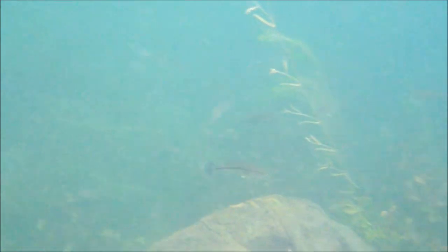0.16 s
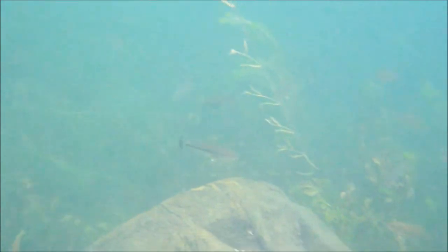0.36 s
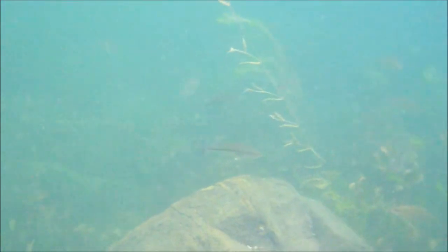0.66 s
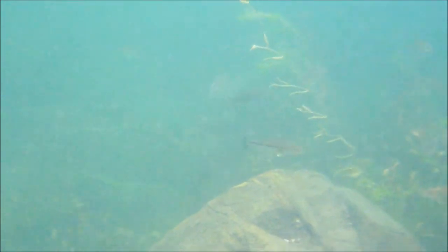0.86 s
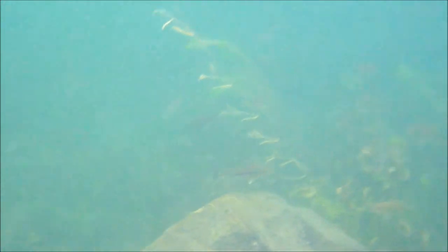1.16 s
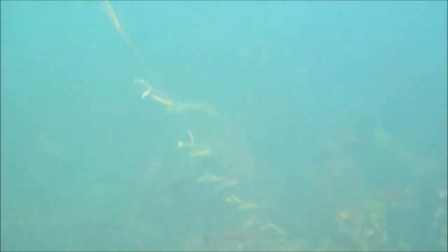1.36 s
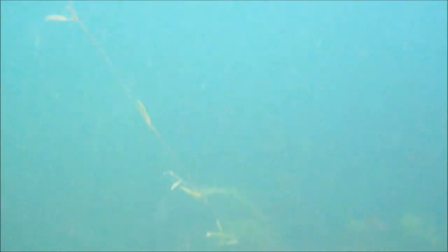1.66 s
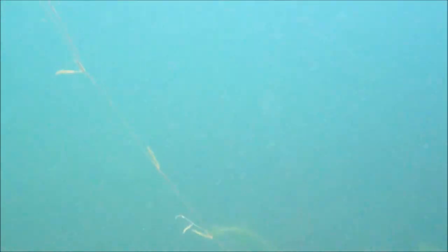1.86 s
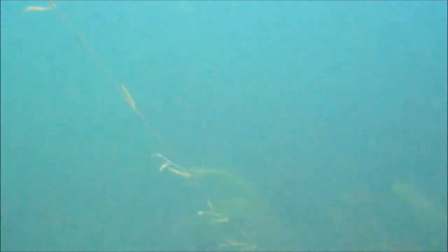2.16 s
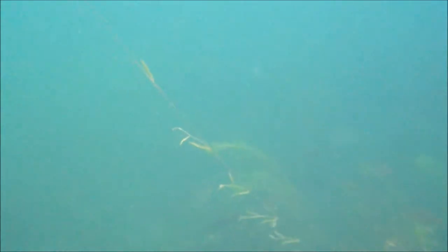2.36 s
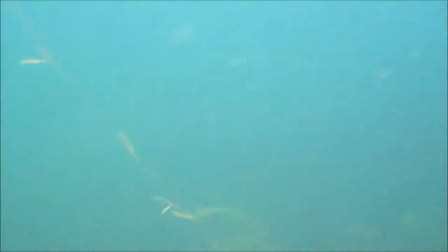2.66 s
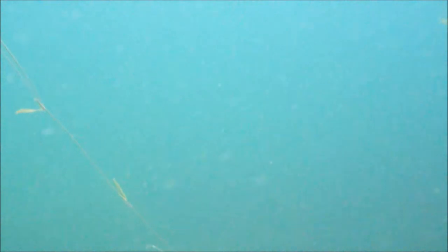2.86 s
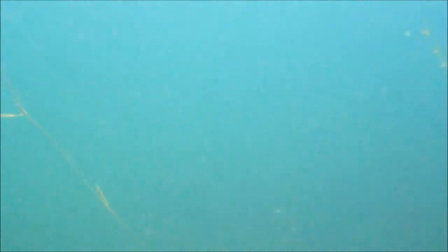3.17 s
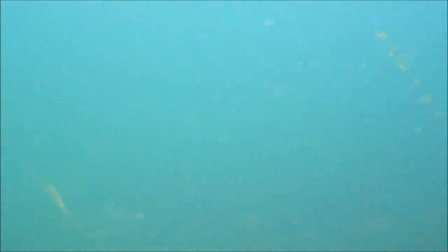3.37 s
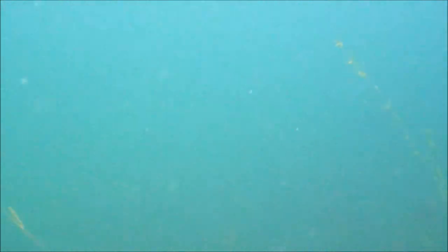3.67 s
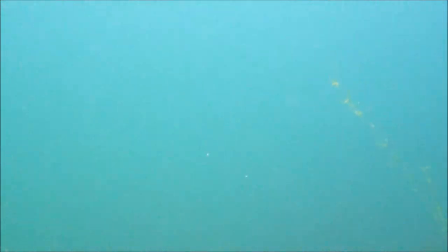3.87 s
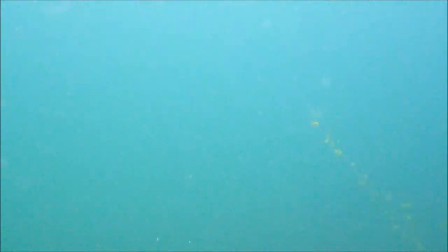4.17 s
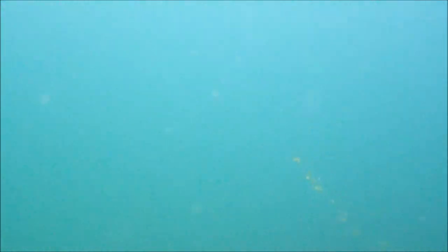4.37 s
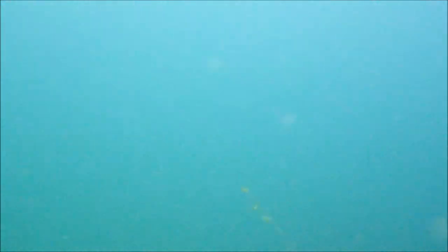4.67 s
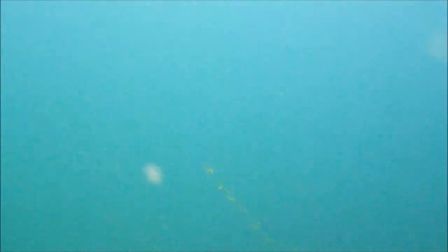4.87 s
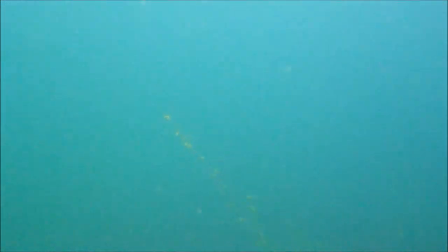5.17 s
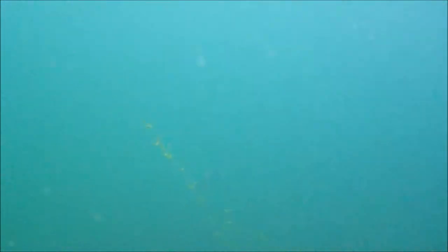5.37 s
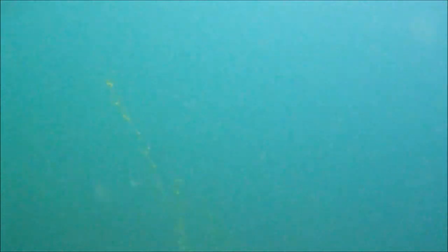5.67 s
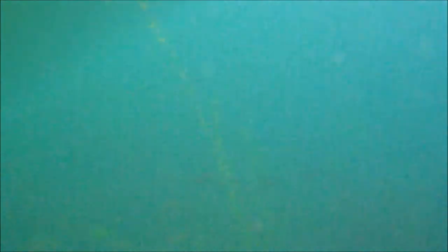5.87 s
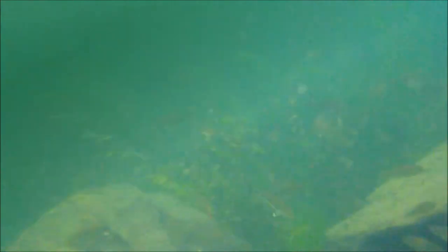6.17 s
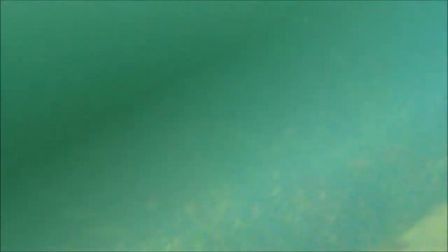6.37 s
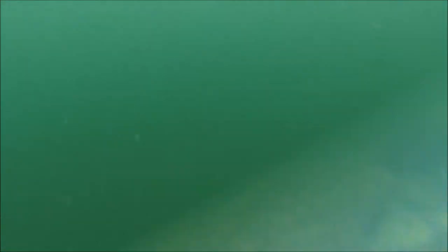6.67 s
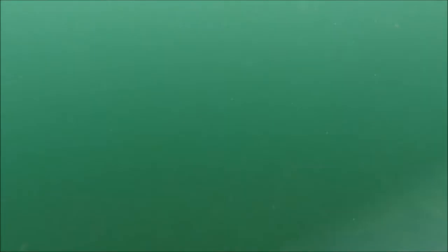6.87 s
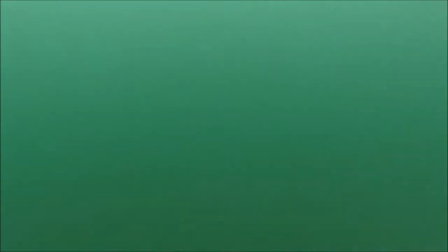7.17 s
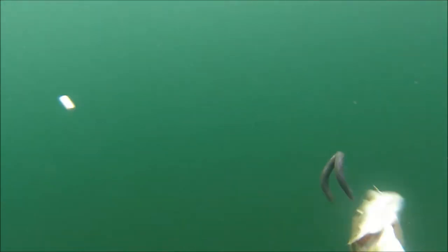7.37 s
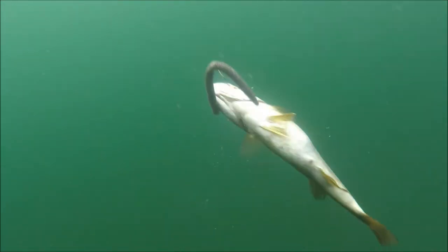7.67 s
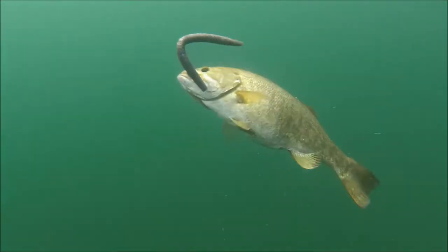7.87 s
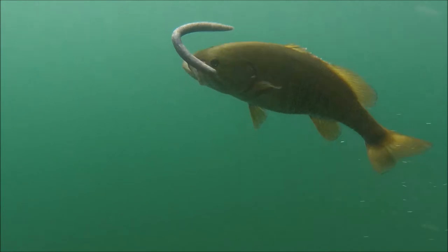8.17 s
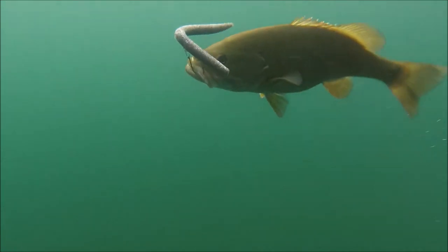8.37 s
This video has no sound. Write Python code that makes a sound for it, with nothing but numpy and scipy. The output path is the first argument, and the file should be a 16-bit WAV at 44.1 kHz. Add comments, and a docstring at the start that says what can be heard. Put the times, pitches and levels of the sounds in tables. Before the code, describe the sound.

Underwater in a lake, close inside a sealed camera housing. From 0 s an electric boat motor gives a thin steady whine over propeller wash, watery fizz, low drone and hiss; it strengthens between about 1.2 and 2 s. Rubs and knocks begin near 0.65 s, with clusters around 1, 2.1-2.8 and 3.5 s, shedding clicks, bubble pops and small gurgles. The busiest burst, with sharp hard taps, runs from 3.8 to 4.9 s, then contacts thin out. At 5.6 s a taut line's low tugs and shudders enter beneath. A coarse scrape drags in jerks from 6.35 s, and motor and hiss stop dead at 6.7 s. Quiet murmuring water remains, with deep wavering shudders renewed by tugs at 6.8 and 7.0-7.5 s, strongest thud near 7.27 s with a faint bright swish. Softer tugs follow until 8.4 s, where a loud bubble pops.

```python
"""A boat's electric motor whines steadily under a lake, over watery fizz, drone and hiss in a camera's housing.
Rubs, knocks and taps ring the housing through resonators; bubbles, short swelling sines, pop around it.
At 5.6 s a quieter view comes in beneath: a camera on a taut line, a wavering low sine that shudders anew
at each tug as a fish takes the lure. The motor's view ends on a jerky scrape and stops dead at 6.7 s."""
import sys
import numpy as np
from scipy import signal
from scipy.fft import rfft, irfft, next_fast_len
from scipy.io import wavfile

SR = 44100
rng = np.random.default_rng(int(sys.argv[2]) if len(sys.argv) > 2 else 0)


def bounce(signal):
    """Save signal as a 16-bit WAV file at the path given by the first command-line argument."""
    frames = np.transpose(np.atleast_2d(signal))
    limited = np.clip(frames, -1, 1)
    pcm = np.round(limited * 32767).astype(np.int16)
    wavfile.write(sys.argv[1], SR, pcm)


N = 375716
SECOND_S, CUT_S = 5.615, 6.672  # the second view starts, the first one stops


def amp(db):
    """Decibels to gain."""
    return 10 ** (np.asarray(db) / 20)


def evened(x):
    """Scales to rms 1."""
    return x / np.sqrt(np.mean(x ** 2) + 1e-20)


def add(mix, s, sound):
    """Mixes a sound in at time s, in seconds."""
    part = mix[max(round(s * SR), 0):][:len(sound)]
    part += sound[:len(part)]


def curve(rows, axis=1):
    """One column of a timed table, drawn as straight lines over every sample."""
    rows = np.asarray(rows)
    return np.interp(np.arange(N) / SR, rows[:, 0], rows[:, axis])


def coloured(x, spectrum):
    """Filters x by a spectrum, at rms 1."""
    hz, db = np.transpose(spectrum)
    size = next_fast_len(len(x))
    f = np.fft.rfftfreq(size, 1 / SR)
    gain = amp(np.interp(np.log(f + 1), np.log(hz), db))
    return evened(irfft(rfft(x, size) * gain, size)[:len(x)])


def wander(rate_hz):
    """Slow random drift of rms 1, with two random points per cycle of the rate."""
    count = int(2 * rate_hz * N / SR) + 2
    points = rng.standard_normal(count)
    return evened(np.interp(np.linspace(0, count - 1, N), np.arange(count), points))


def ring(x, modes):
    """Passes x through steep resonances, each a peak filter run twice, at rms 1."""
    out = np.zeros(len(x))
    for hz, width, db in modes:
        b, a = signal.iirpeak(hz, hz / (np.pi / 2 * width), SR)
        once = signal.lfilter(b, a, x)
        out += amp(db) * signal.lfilter(b, a, once)
    return evened(out)


def slips(size, per_s, spread_db):
    """Stick and slip: a random train of clicks of uneven size and either sign."""
    sizes = amp(spread_db * np.minimum(rng.exponential(1, size), 4))
    signs = rng.choice([-1, 1], size)
    return sizes * signs * (rng.random(size) < per_s / SR)


def stroke(length, tail_s, per_s, spread_db, blow=0):
    """A contact lands with a blow, slips on as the pressure eases, and dies away."""
    t = np.arange(int((length + .1) * SR)) / SR
    press = np.exp(-.5 * t / length - np.maximum(t - length * 0.59, 0) / tail_s)
    drive = press * slips(len(t), per_s, spread_db)
    return drive + blow * np.linalg.norm(drive) * (t == 0)


def bubble(hz, swell_s, tail_db=-22, linger=3.6, rise=.03):
    """A bubble swells and rings briefly, rising slightly; a slower one lingers longer. Peak about 1."""
    u = np.arange(SR // 20) / SR / swell_s  # time in swells
    swell = u ** 2 * np.exp(2 - 2 * u)
    tail = (1 - np.exp(-u)) ** 2 * np.exp(-u / linger)
    turns = np.cumsum(hz * (1 + rise * np.tanh(u - 1))) / SR
    return (swell + amp(tail_db) * tail) * np.sin(2 * np.pi * turns)


# Whine of the motor. Each row: multiple of the base pitch, relative level in dB.
WHINE = [(4, -3.5), (7, 6), (8, 0), (10, -18.5), (11, -4), (19, -14.5)]
# Resonances of the propeller wash. Each row: pitch in Hz, width in Hz, relative level in dB.
WASH = [(680, 37, -0.5), (880, 64, 6.5), (1154, 121, 9), (1290, 36, -25), (1666, 170, 6.5), (1788, 39, 3.5)]
# Colour of the watery fizz. Each row: frequency in Hz, relative level in dB per Hz.
FIZZ = [(500, -6), (1400, -43), (1850, 5.5), (2080, 1), (2400, 3), (3100, -1.5), (3500, -6.5),
        (4000, -18.5), (7000, -59.5)]
# How strongly the motor arrives. Each row: time in seconds, motor level in dB, fizz level in dB before its lift.
ARRIVAL = [(0.2, -47.5, -44), (0.9, -47.5, -42.5), (1.25, -47, -43), (1.5, -43, -44.5), (1.9, -40.5, -45),
           (3.2, -40, -46), (3.95, -39.5, -48.5), (5.2, -39.5, -52.5), (6.2, -38.0, -47)]


def motor(base_hz=161.5, wash_db=0.0, fizz_lift_db=2, fade_db=1.5, swirl_db=1):
    """Motor harmonics, each fading on its own path through the water, over propeller wash and fizz."""
    drift = .0009 * wander(2) + .002 * wander(60)
    turns = np.cumsum(base_hz * (1 + drift)) / SR
    whine = np.zeros(N)
    for multiple, db in WHINE:
        fading = amp(db + fade_db * wander(12))
        whine += fading * np.sin(2 * np.pi * (multiple * turns + rng.random()))
    wash = ring(rng.standard_normal(N), WASH) * amp(swirl_db * wander(11))
    fizz = coloured(slips(N, 6000, 3.8), FIZZ)
    near = evened(whine) + amp(wash_db) * wash
    return amp(curve(ARRIVAL)) * near + amp(curve(ARRIVAL, axis=2) + fizz_lift_db) * fizz


# Colour of the water's drone. Each row: frequency in Hz, relative level in dB per Hz.
DRONE = [(25, -16), (60, -4), (110, -14), (170, -4), (230, 0), (310, 2.5), (370, -1.5), (440, -10),
         (600, -3), (1200, -13.5), (3000, -37)]
# Colour of the first camera's hiss. Each row: frequency in Hz, relative level in dB per Hz.
HISS = [(100, -43), (3000, 4.5), (5000, 4.5), (7000, 2.5), (7720, 0), (7890, -38), (8080, 1), (14500, 3),
        (16000, -6)]


def background(drone_db=-46, hiss_db=-50, lap_db=2):
    """Water droning in the housing as unsteady low noise, and the first camera's even hiss."""
    drone = coloured(rng.standard_normal(N), DRONE) * amp(drone_db + lap_db * wander(5.7))
    return drone + amp(hiss_db) * coloured(rng.standard_normal(N), HISS)


def electronics(level_db=-63, uneven_db=5, tilt_db=9):
    """Faint treble buzz of the camera's circuits, steady tones on odd multiples of its frame rate."""
    hz = np.arange(12510, 15600, 60)  # odd multiples of 30 Hz
    db = uneven_db * rng.standard_normal(len(hz)) + tilt_db * np.linspace(0, 1, len(hz))
    lines = np.zeros(SR // 2 + 1, complex)  # one bin per Hz
    lines[hz] = amp(db) * np.exp(2j * np.pi * rng.random(len(hz)))
    return amp(level_db) * evened(np.resize(irfft(lines), N))


def stray_bubbles(level_db=-31, spread_db=4, low_hz=2200, high_hz=4000, cycles=1.23, count=20):
    """Now and then a tiny bubble ticks somewhere in the water, one in each equal slice of the first view."""
    out = np.zeros(N)
    for k, (when, size, loud) in enumerate(rng.random((count, 3))):
        hz = low_hz * (high_hz / low_hz) ** size
        db = level_db + spread_db * (2 * loud - 1)
        add(out, (k + when) / count * CUT_S, amp(db) * bubble(hz, cycles / hz))
    return out


# Low resonances of a thud. Each row: factor on its pitch, width in Hz, relative level in dB.
BODY = [(0.76, 53.5, 0), (0.998, 57.4, 7), (1.2, 50, -18)]
# Modes of the housing's walls. Each row: pitch in Hz, width in Hz, relative level in dB.
WALLS = [(640, 99, 7), (900, 145, 3), (1023, 140, 2), (1514, 140, -1.5), (1733, 105, 1)]
# Modes of its window. Each row: pitch in Hz, width in Hz, relative level in dB.
WINDOW = [(2764, 230, 14), (3097, 290, 13), (5040, 1100, -2.5)]
# Rubs and knocks on the housing.
# Each row: start in seconds, length in seconds, thud pitch in Hz, thud level in dB, grit level in dB.
RUBS = [(0.647, 0.034, 276, -26.5, -53), (0.687, 0.065, 283, -25.5, -38), (0.9988, 0.0064, 296, -16, -26.5),
        (1.049, 0.071, 228, -23.5, -35.5), (1.119, 0.1, 241, -23, -40.5), (1.343, 0.019, 271, -29.5, -42),
        (2.092, 0.014, 293, -22.5, -30.5), (2.109, 0.049, 218, -27, -31), (2.362, 0.054, 287, -19, -36),
        (2.411, 0.029, 294, -24.5, -25.5), (2.461, 0.072, 246, -27.5, -33), (2.53, 0.014, 229, -16, -24.5),
        (2.557, 0.05, 230, -21, -31.5), (2.755, 0.19, 202, -24, -41), (2.986, 0.0087, 256, -18.5, -45),
        (3.475, 0.029, 244, -16.5, -20.5), (3.739, 0.035, 250, -28.5, -48),
        (3.787, 0.033, 294, -27.5, -34.5), (4.141, 0.0074, 274, -20, -29.5), (4.167, 0.04, 283, -27, -41),
        (4.321, 0.11, 242, -25, -33), (4.398, 0.079, 312, -24, -27.5), (4.466, 0.06, 288, -32.5, -31.5),
        (4.588, 0.017, 241, -19, -31), (4.66, 0.0078, 308, -20, -32.5), (4.689, 0.055, 290.5, -21, -35.5),
        (4.773, 0.036, 325, -34.5, -32.5), (5.293, 0.01, 294, -32, -57)]


def rubs(window_db=-9.5):
    """Each contact drives the housing: its body thuds, and grit makes its walls knock and its window crackle."""
    out = np.zeros(N)
    for s, length, hz, thud, grit in RUBS:
        body = [(hz * factor, width, db) for factor, width, db in BODY]
        sound = amp(thud) * ring(stroke(length, 0.016, 1500, 2.25, blow=0.38), body)
        sound += amp(grit) * ring(stroke(length, 0.0057, 600, 6.2, blow=0.26), WALLS)
        # the window crackles at its own level below the grit
        sound += amp(grit + window_db) * ring(stroke(length, 0.0067, 600, 3.6), WINDOW)
        add(out, s, sound * np.sqrt(length * SR / len(sound)))  # levels hold over the length of the contact
    return out


def fine_bubbles(per_s=130, lag_s=0.01, low_hz=1500, high_hz=6500, level_db=-1, spread_db=4,
                 cycles=7.5, tilt_db=-5):
    """Rubs shed tiny bubbles by chance, more for longer rubs; the smaller, the higher and fainter."""
    out = np.zeros(N)
    for s, length, _, _, grit in RUBS:
        chance, when, size, loud = rng.random((12, 4)).T
        for k in np.flatnonzero(chance < per_s * length / len(chance)):
            hz = low_hz * (high_hz / low_hz) ** size[k]
            db = grit + level_db + spread_db * (2 * loud[k] - 1) + tilt_db * np.log2(hz / low_hz)
            wait = -np.log(1 - when[k]) * (.5 * length + lag_s)  # most pop early, a few linger
            add(out, s + wait, amp(db) * bubble(hz, cycles / hz))
    return out


# Loud single bubbles. Each row: start in seconds, level in dB before crack and rattle, pitch in Hz.
POPS = [(0.7363, -19, 2380), (1.1059, -18.5, 2880), (1.356, -9, 2810), (2.1286, -3.5, 3080),
        (2.421, -12, 3040), (2.4224, -11, 1095), (2.4388, -10, 2700), (2.5226, -11, 1020),
        (2.5305, -9, 1030), (2.561, -20, 2980), (2.876, -17.5, 1290), (3.0586, -18, 2830), (3.473, -6, 956),
        (3.4877, -14, 3200), (4.26, -13, 1120), (4.359, -12.5, 1400), (4.3777, -5.5, 1035),
        (4.386, -9.5, 1020), (4.4003, -12.5, 3120), (4.427, -15.5, 2770), (4.577, -16.5, 1000),
        (5.797, -19, 2440), (6.0698, -18, 2130), (7.7526, -37, 3150), (7.922, -36, 3800),
        (8.21, -21.5, 3500), (8.3565, -21, 1130), (8.3717, -3, 1122)]
# Sharp taps on the housing's wall. Each row: start in seconds, level in dB before crack and rattle.
TAPS = [(1.0, -15.5), (2.535, -15), (3.8036, -1), (4.1737, -5.5), (4.3157, -5.5), (4.439, -3),
        (4.446, -8.5), (4.491, -11.5), (4.5915, -14), (4.663, -20), (4.863, -11.5)]


def pops_and_taps(snap_db=-35, rattle_db=-24, crack_db=-19, crack_hz=1900, crack_s=0.00068):
    """Loud bubbles and taps; each also gives the housing a short crack, a bright snap and a rattle of echoes."""
    out = np.zeros(N)
    for s, db, hz in POPS:
        add(out, s, amp(db) * bubble(hz, 2.4 / hz))  # smaller, higher bubbles swell and die sooner
    for s, db in TAPS:
        add(out, s, amp(db) * bubble(1064, 0.00078))
    crack = amp(crack_db) * bubble(crack_hz, crack_s)
    snap = amp(snap_db) * bubble(5790, 0.00016)
    for s, db, *_ in POPS + TAPS:
        add(out, s, amp(db) * (crack + snap))
    echoes = stroke(.01, 0.007, 2400, 2.2)
    rattle = signal.oaconvolve(out, echoes / np.linalg.norm(echoes))[:N]
    return out + amp(rattle_db) * rattle


# Gurgles, clouds of bubbles.
# Each row: start in seconds, length in seconds, middle pitch in Hz, level in dB before each bubble's spread.
GURGLES = [(1.009, 0.1, 2510, -23), (2.707, 0.11, 2570, -23), (3.018, 0.061, 2670, -21.5),
           (4.275, 0.23, 1375, -17.5), (4.297, 0.16, 4300, -23.5), (4.678, 0.062, 644, -21),
           (4.887, 0.09, 1000, -24.5)]


def gurgles(per_s=55, spread_octaves=0.48, spread_db=4, cycles=3.1):
    """Stirred water lets go a loose string of bubbles of like size."""
    out = np.zeros(N)
    for s, length, middle_hz, db in GURGLES:
        for k, (when, size, loud) in enumerate(rng.random((30, 3))):
            wait = (k + when) / per_s
            hz = middle_hz * 2 ** (spread_octaves * (2 * size - 1))
            if wait < length:
                add(out, s + wait, amp(db + spread_db * (2 * loud - 1.5)) * bubble(hz, cycles / hz))
    return out


# Dry bright ticks on the lens window. Each row: start in seconds, level in dB.
TICKS = [(2.2115, -19), (2.415, -15), (8.003, -38), (8.2099, -26)]


def ticks(hz=5700, swell_s=0.00018):
    """Specks of grit hit the window: very short high rings, bright and dry."""
    out = np.zeros(N)
    for s, db in TICKS:
        add(out, s, amp(db) * bubble(hz, swell_s))
    return out


# Colour of a tug's thud. Each row: frequency in Hz, relative level in dB per Hz.
TUG_THUD = [(25, -5), (50, 17), (90, 15.5), (160, 9.5), (210, 8.5), (350, 4.5), (480, -22.5), (3000, -93)]
# Colour of a tug's tick. Each row: frequency in Hz, relative level in dB per Hz.
TUG_TICK = [(200, -18), (450, -1.5), (900, 3.5), (1500, 9), (2200, -1), (2800, -12.5), (7000, -26.5),
            (12000, -36), (16000, -39)]
# Tugs on the line.
# Each row: start in seconds, length in seconds, thud level in dB, tick level in dB, shudder level in dB.
TUGS = [(5.613, 0.04, -39, -64, -24), (5.734, 0.038, -29.5, -54, -21.5), (6.068, 0.025, -27.5, -49, -24),
        (6.816, 0.03, -22.5, -41.5, -13.5), (7.011, 0.033, -35.5, -54.5, -25),
        (7.159, 0.098, -36.5, -50.5, -18.5), (7.267, 0.021, -18.5, -37, -14), (7.294, 0.12, -30, -51, -21),
        (7.437, 0.025, -34, -63, -21.5), (7.517, 0.0095, -36, -43.5, -19.5), (7.843, 0.11, -35.5, -51, -25),
        (7.999, 0.028, -37, -46, -28), (8.356, 0.031, -57, -38.5, -29)]


def line(shudder_hz=26, waver=0.039, rise_s=0.014, fall_db_per_s=29.5):
    """Each tug thuds and ticks in the camera and sets the taut line shuddering anew at its own low pitch."""
    t = np.arange(N) / SR
    knocks, swing = np.zeros(N), np.zeros(N)
    for s, length, thud, tick, shudder in TUGS:
        sound = amp(thud) * coloured(stroke(length, 0.024, 500, 1.5, blow=0.29), TUG_THUD)
        sound += amp(tick) * coloured(stroke(length, 0.011, 600, 5.3), TUG_TICK)
        sound *= np.sqrt(length * SR / len(sound))  # levels hold over the length of the tug
        add(knocks, s, sound * signal.windows.tukey(len(sound), .02))
        after = t >= s
        swing[after] = amp(shudder - fall_db_per_s * (t[after] - s))  # replaces the last tug's swing
    lag = np.exp(-1 / (rise_s * SR))
    swing = signal.lfilter([1 - lag], [1, -lag], swing)
    turns = np.cumsum(shudder_hz * (1 + waver * wander(8.8))) / SR
    return knocks + swing * np.sqrt(2) * np.sin(2 * np.pi * turns)


# Colour of the water round the second camera. Each row: frequency in Hz, relative level in dB per Hz.
STILL_WATER = [(25, -0.5), (60, -0.5), (110, -6), (160, -12), (320, -13.5), (500, -23), (900, -26),
               (1850, -28.5), (2080, -19.5), (2450, -37.5), (3400, -37), (5000, -44), (10000, -51),
               (15000, -64)]


def still_water(level_db=-43, swell_db=2):
    """Low murmur of water round the second camera: noise that swells and sinks at random."""
    return amp(level_db + swell_db * wander(5.8)) * coloured(rng.standard_normal(N), STILL_WATER)


# Drags of a coarse scrape. Each row: start in seconds, length in seconds, level in dB at the catch.
SCRAPE = [(6.363, 0.031, -20.5), (6.43, 0.054, -29), (6.553, 0.12, -20.5)]
# Colour of the scrape. Each row: frequency in Hz, relative level in dB per Hz.
SCRAPE_COLOUR = [(60, -20), (150, -4.5), (220, 0), (350, 6), (430, -4), (550, 2), (800, -2.5), (1150, -3.5),
                 (1450, -9), (1850, -4), (2300, -11.5), (3200, -14), (5500, -29.5), (8000, -43)]


def scrape(attack_s=0.0084, ease_db_per_s=55, release_s=0.019):
    """Something rough catches on the housing and drags across it in jerks, each easing as it goes."""
    t = np.arange(N) / SR
    press = np.zeros(N)
    for s, length, db in SCRAPE:
        age = np.maximum(t - s, 0)
        attack = np.minimum(age / attack_s, 1)
        release = np.exp(-np.maximum(age - length, 0) / release_s)
        press += attack * amp(db - ease_db_per_s * age) * release
    return press * coloured(slips(N, 2500, 2.0), SCRAPE_COLOUR)


# Swish of the line cutting through the water. Each row: time in seconds, level in dB.
SWISH = [(7.15, -78), (7.33, -59), (7.47, -64.5), (7.6, -78)]
# Bands of the swish. Each row: pitch in Hz, width in Hz, relative level in dB.
SWISH_BANDS = [(3460, 600, 2), (5500, 770, -1), (6900, 640, -3), (10500, 1500, -13)]


def swish(per_s=900, spread_db=3):
    """The running line rasps faintly through the water: random clicks through bright bands."""
    t = np.arange(N) / SR
    running = (t > SWISH[0][0]) & (t < SWISH[-1][0])
    return running * amp(curve(SWISH)) * ring(slips(N, per_s, spread_db), SWISH_BANDS)


def housed(x, low_cut_hz=135, dip_hz=475, dip_width_hz=110):
    """The sealed housing holds back deep bass and has a weak spot between body and walls."""
    x = signal.lfilter(*signal.butter(2, low_cut_hz, "high", fs=SR), x)
    return x - 0.4 * signal.lfilter(*signal.iirpeak(dip_hz, dip_hz / dip_width_hz, SR), x)


def scene():
    """The two views overlap for a second, then the motor's view stops dead; pops and ticks run through."""
    t = np.arange(N) / SR
    first = motor() + background() + electronics() + rubs() + fine_bubbles() + gurgles() + scrape()
    first *= t < CUT_S
    second = (line() + swish() + still_water()) * (t > SECOND_S)
    return (housed(first + pops_and_taps() + ticks() + stray_bubbles()) + second)[None]


def record(dry, edge_hz=15850):
    """Limits the band with a steep low-pass."""
    low_pass = signal.firwin(511, edge_hz, window=("kaiser", 9), fs=SR)
    return signal.oaconvolve(dry, low_pass[None], "same")


dry = scene()
out = record(dry)
bounce(out)
```